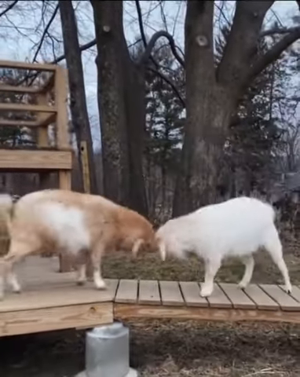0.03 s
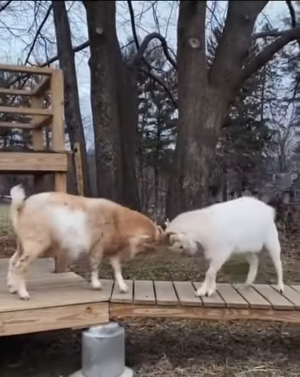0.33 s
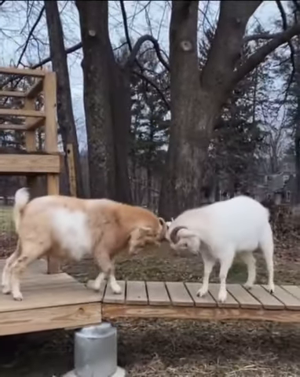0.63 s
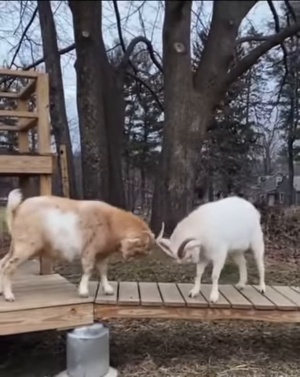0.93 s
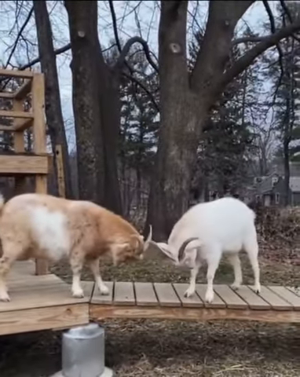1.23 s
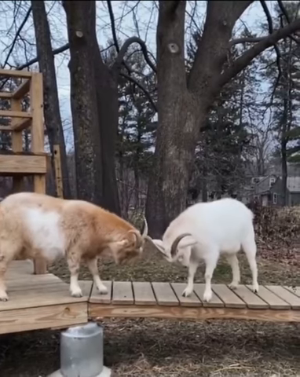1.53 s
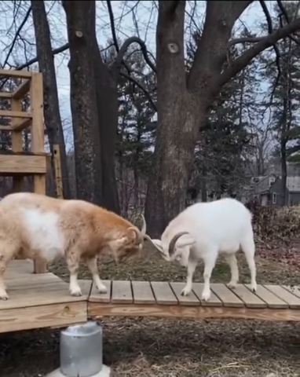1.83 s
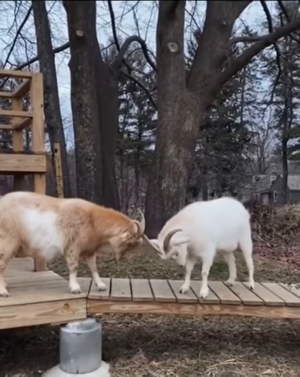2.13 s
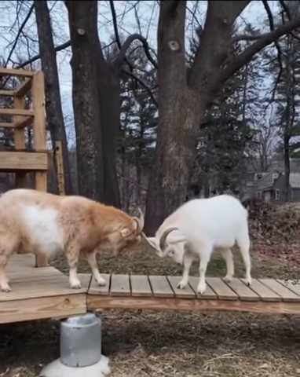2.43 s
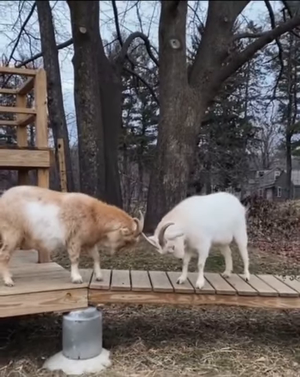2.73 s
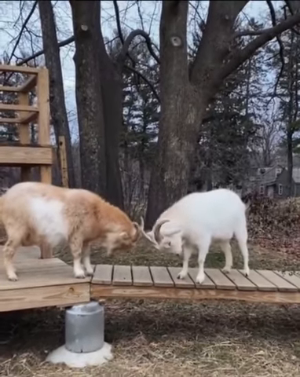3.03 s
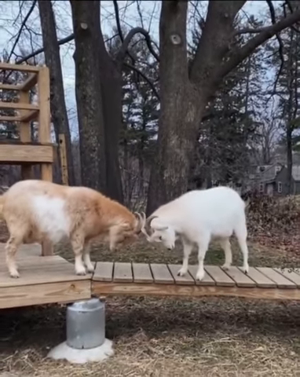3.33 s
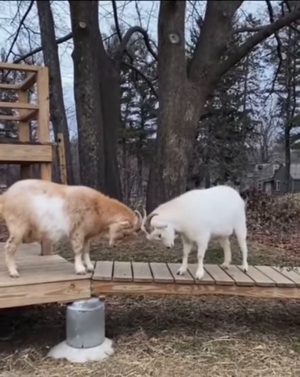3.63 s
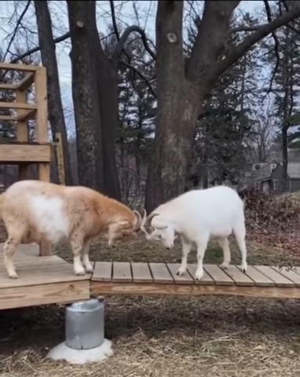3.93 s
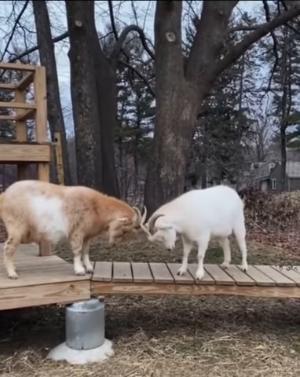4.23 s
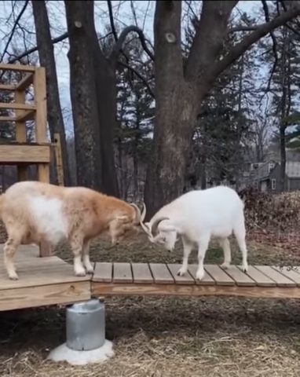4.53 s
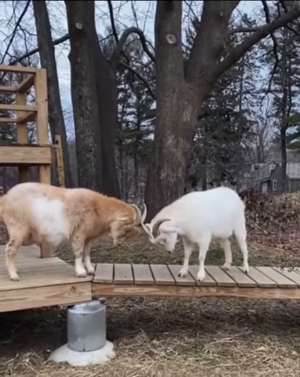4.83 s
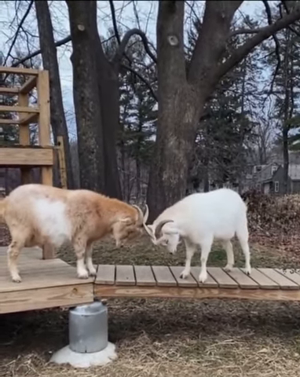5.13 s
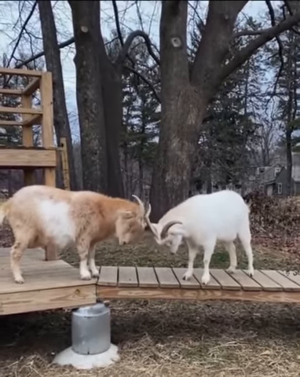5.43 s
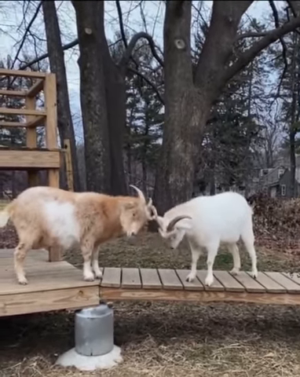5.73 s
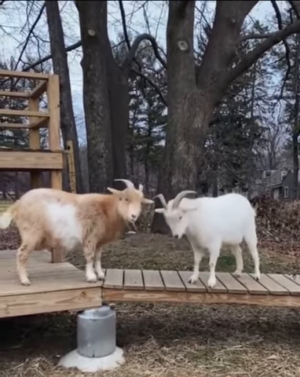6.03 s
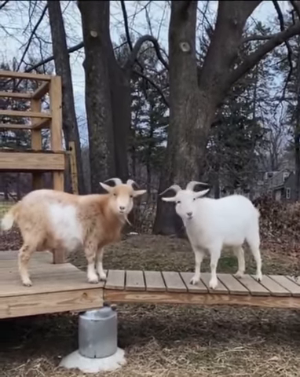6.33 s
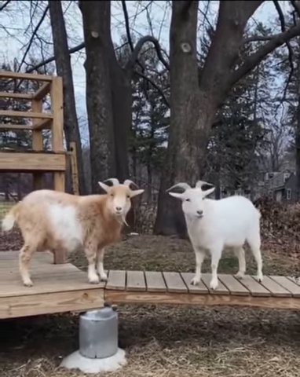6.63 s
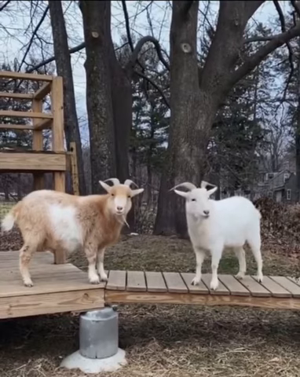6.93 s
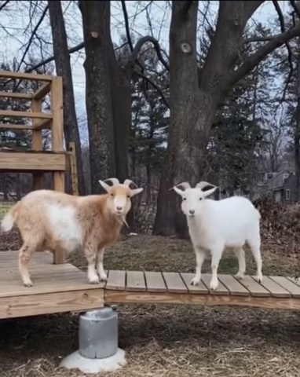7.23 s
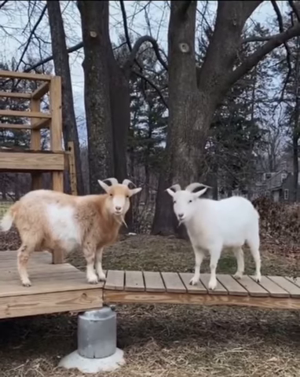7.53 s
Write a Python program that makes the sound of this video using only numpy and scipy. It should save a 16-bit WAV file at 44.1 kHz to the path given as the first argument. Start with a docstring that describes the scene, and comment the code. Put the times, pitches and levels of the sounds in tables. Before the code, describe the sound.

A quick, uneven burst of hoof knocks, horn clacks and scrapes on wooden boards opens the scene as two goats clash. It soon eases to faint rubbing of horn, hoof and coat, broken by a few small taps and a dull thump with a short scrape, then fades almost to nothing. The microphone is a few metres off in a yard with a steady low rumble.

```python
"""A raised wooden walkway in a quiet yard: two goats butt heads and shuffle, a few metres from a phone.
Horns and hooves clack, the planks ring under the blows and the beams thud as the weight shifts.
Then the goats lean on each other: hoof, horn and coat stick and slip in soft dry scuffs.
A low outdoor rumble runs underneath."""
import sys
import numpy as np
from scipy import signal
from scipy.fft import rfft, irfft, next_fast_len
from scipy.io import wavfile
from scipy.ndimage import uniform_filter1d

SR = 44100
rng = np.random.default_rng(int(sys.argv[2]) if len(sys.argv) > 2 else 0)


def log_audio(samples):
    """Write samples as a 16-bit WAV file to the path given in sys.argv[1]."""
    # one column per channel
    frames = np.atleast_2d(samples).T
    # limit to full scale, then quantise
    limited = np.clip(frames, -1, 1)
    pcm = np.round(limited * 32767).astype(np.int16)
    wavfile.write(sys.argv[1], SR, pcm)


N = 339129
TIME_S = np.arange(N) / SR
AGE_S = np.arange(SR // 2) / SR  # time within one event
MIC_LAG_S = 23 / SR  # right behind left


def undb(db):
    """Decibels to gain."""
    return 10 ** (np.asarray(db) / 20)


def db_at(spectrum, hz):
    """Read an f/Hz, level/dB table on a log-frequency axis."""
    f, db = np.transpose(spectrum)
    return np.interp(np.log(np.maximum(hz, 1)), np.log(np.maximum(f, 1)), db)


def shape(x, gain):
    """Zero-phase filter by gain(f)."""
    size = next_fast_len(x.shape[-1] + 2048)
    return irfft(rfft(x, size) * gain(np.fft.rfftfreq(size, 1 / SR)), size)[..., :x.shape[-1]]


def colour(x, spectrum):
    """Filter by an f/Hz, level/dB table."""
    return shape(x, lambda f: undb(db_at(spectrum, f)))


def resonate(x, hz, q, stages=1):
    """Two-pole resonances in series."""
    for _ in range(stages):
        x = signal.lfilter(*signal.iirpeak(hz, q, fs=SR), x)
    return x


def bell(f, centre_hz, width_oct):
    """Peak on a log-frequency axis, half height at +-width_oct."""
    return 1 / (1 + (np.log2(np.maximum(f, 1) / centre_hz) / width_oct) ** 2)


def unit(x):
    """Scale to rms 1."""
    return x / np.sqrt(np.mean(x ** 2))


def blow(x, db):
    """Scale so the energy, spread over 30 ms, has this level."""
    return unit(x) * undb(db) * np.sqrt(0.03 * SR / x.shape[-1])


def fade(t60_s):
    """Exponential decay."""
    return np.exp(-np.log(1000) * AGE_S / t60_s)


def rise(tau_s):
    """Exponential attack."""
    return 1 - np.exp(-AGE_S / tau_s)


def add(out, t_s, x):
    """Mix x into out from t_s."""
    i = max(int(t_s * SR), 0)
    out[:, i:i + x.shape[-1]] += x[..., :N - i]


def mic_noise(shared, lag_s=0):
    """Stereo noise; the shared fraction of its power arrives lag_s later on the right."""
    common, *own = rng.standard_normal((3, len(AGE_S)))
    pair = np.array([common, np.roll(common, round(lag_s * SR))])
    return np.sqrt(shared) * pair + np.sqrt(1 - shared) * np.array(own)


def ring_modes(hz, gains, decays, lag_rad):
    """Sum of decaying sines, lagging on the right."""
    phase = 2 * np.pi * hz[:, None] * AGE_S
    return np.array([gains @ (decays * np.sin(p)) for p in (phase, phase - lag_rad[:, None])])


# Outdoor noise density: f/Hz, level/dB
YARD_SPECTRUM = [(20, -24.5), (35, -7), (55, 3), (90, 0.5), (130, -1.5), (215, -9), (300, -12.5),
                 (450, -17.5), (680, -20.5), (900, -30.5), (1250, -44), (2700, -53.5), (4600, -57),
                 (7500, -50.5), (9700, -63)]
# Stereo width: f/Hz, side re mid/dB
YARD_WIDTH = [(60, -29.5), (110, -16), (190, -6.5), (330, -4), (590, 3), (1040, 9.5), (1830, 8),
              (3240, 11.5), (5730, -16), (10100, -2.5)]


def yard_rumble(waver_db=2.1, waver_step_s=0.09, pan_db=0.75):
    """Outdoor rumble, near mono in the bass, with faint air above; each octave wavers on its own."""
    mid, side = colour(rng.standard_normal((2, N)), YARD_SPECTRUM)
    left_right = np.array([[1], [-1]])
    air = mid + colour(side, YARD_WIDTH) * left_right
    octaves = np.arange(6, 14)  # 64 to 8192 Hz
    knots_s = np.arange(0, 8, waver_step_s)
    out = np.zeros((2, N))
    for octave in octaves:
        band = shape(air, lambda f: np.interp(np.log2(f + 1), octaves, octaves == octave))
        waver = np.interp(TIME_S, knots_s, rng.standard_normal(len(knots_s)))
        out += band * undb(waver_db * waver)
    level_db = np.interp(TIME_S, [3.5, 7.69], [-34, -37])
    return unit(out) * undb(level_db + pan_db * left_right)


def spot_note(hz, decay_cycles):
    """The struck spot's heavily damped note swells and dies within a few cycles."""
    lag_s = MIC_LAG_S * min(hz / 640, 1)
    cycles = hz * np.maximum([AGE_S, AGE_S - lag_s], 0)
    return np.sin(2 * np.pi * cycles) * cycles ** 2 * np.exp(-cycles / decay_cycles)


# Deck modes: f/Hz, level/dB, nominal t60/s
DECK_MODES = [(138, -1, 0.3), (152.4, 6, 0.35), (181.7, 9, 0.38), (212, 12, 0.13), (248, 8.5, 0.53),
              (292, 2, 0.37), (328.6, -7, 0.42), (369.6, 5, 0.29), (408.6, -6.5, 0.34), (455, 4, 0.4),
              (516, 9, 0.12), (568, -8, 0.28), (618, 5.5, 0.13), (691, 8.5, 0.18), (752, -1, 0.098),
              (836, 3.5, 0.16), (864, 4.5, 0.17), (991, 7.5, 0.13), (1183, 2, 0.26)]
# Hoof on plank: t/s, deck level/dB, deck centre f/Hz, plank re deck/dB, tock level/dB, tock f/Hz,
# tock decay/cycles, clack level/dB, clack f/Hz, crack re clack/dB
HOOFFALLS = [(0.001, -11, 181, -49, -19.5, 193, 2.5, -39.5, 1220, -2),
             (0.058, -34.5, 480, -13.5, -38, 560, 2, -52, 1200, -16),
             (0.1068, -15, 490, -16.5, -17, 607, 1.05, -23.5, 1573, -9.5),
             (0.1214, -17, 404, -33.5, -21, 430, 0.46, -32, 1456, -17),
             (0.166, -24, 366, -10, -28, 870, 1.2, -49, 1400, -22.5),
             (0.204, -27, 297, -8, -36.5, 740, 2, -32.5, 1070, -15),
             (0.261, -17.5, 377, -57, -24, 380, 2.7, -32, 1140, -15),
             (0.352, -24, 350, -16.5, -29, 827, 2.2, -32.5, 1160, -29),
             (0.458, -24, 285, -16.5, -28.5, 1314, 5.2, -27.5, 1450, -30),
             (0.4871, -17.5, 248, -6.5, -40.5, 725, 1.5, -23.5, 1595, -21),
             (0.492, -19.5, 455, -36, -24, 256, 0.63, -26, 1430, -21),
             (0.613, -33, 600, 0, -43, 776, 2, -38, 1610, -26),
             (0.682, -53.5, 720, -6, -42.5, 830, 1.2, -49.5, 1490, -25),
             (0.807, -29, 540, -2, -29.5, 703, 1.8, -31.5, 1384, -24),
             (0.817, -28, 514, -20, -37, 674, 3.3, -40, 1810, -3),
             (0.8421, -35, 750, -10, -26, 803, 1, -35, 1520, -7),
             (1.038, -22, 366, -10, -25.5, 670, 1.6, -28.5, 1286, -4.5),
             (1.056, -27, 296, -36, -23, 314, 1.18, -60, 1400, -21),
             (2.732, -26.5, 393, -21, -33.5, 467, 5, -35.5, 1018, -17.5),
             (2.758, -38, 330, -16, -31.5, 258, 1.7, -52, 1100, -13),
             (3.11, -30, 596, 0, -38.5, 554, 1.3, -39.5, 1430, -4.5),
             (3.152, -39, 520, -9, -38, 790, 0.6, -47, 1510, -24),
             (3.602, -38.5, 430, -16, -36, 278, 1.2, -43, 2210, -6),
             (5.502, -29, 245, -53, -32, 270, 0.58, -74, 1160, -40),
             (7.1947, -41.5, 553, -20, -40.5, 567, 0.53, -47.5, 1330, -15)]


def deck_knocks(plank_hz=790, t60_scale=0.8, uneven_db=5, rattle_db=-8, deck_delay_s=0.001663):
    """A hoof rings the deck and, higher up, the struck plank, with a hollow tock; loose boards rattle."""
    out = np.zeros((2, N))
    hz, mode_db, t60_s = np.transpose(DECK_MODES)
    decays = np.array([fade(t * t60_scale) for t in t60_s])
    # Low modes radiate from the whole deck and lag less; high ones come from the struck spot.
    lag_rad = 2 * np.pi * hz * MIC_LAG_S * np.minimum(hz / 640, 1)
    rattle_band = lambda f: np.minimum(f / 300, 1) ** 2 / (1 + (f / 1500) ** 4)
    for t_s, db, centre_hz, plank_db, tock_db, tock_hz, tock_cycles, *_ in HOOFFALLS:
        focus = lambda f: bell(f, centre_hz, 0.37) + undb(plank_db) * bell(f, plank_hz, 0.38)
        uneven, polarity, detune, skew = rng.standard_normal((len(hz), 4)).T
        gains = focus(hz) * undb(mode_db + uneven_db * uneven) * np.sign(polarity + 0.5)
        ring = ring_modes(hz * (1 + 0.007 * detune), gains, decays, lag_rad * (1 + 0.1 * skew))
        rattle = shape(mic_noise(shared=0.73), lambda f: focus(f) * rattle_band(f))
        body = unit(ring) + undb(rattle_db) * unit(rattle * fade(t60_s=0.36))
        tock = blow(spot_note(tock_hz, tock_cycles), tock_db)
        add(out, t_s + deck_delay_s, blow(body * rise(tau_s=0.0025), db) + tock)
    return out


# High modes of horn and board: f/Hz, level/dB
HARD_MODES = [(1004, 5.5), (1184, 3), (1271, 0), (1384, -3.5), (1451, -4.5), (1492, -3), (1662, 4),
              (1760, 1.5), (1873, -2.5), (2040, 3.5), (2208, 1.5), (2614, 1), (2850, 0)]


def clack(db, hz, crack_db, tick_db, tick_cycles, ring_s, crack_t60_s, crack_top_hz):
    """A hard contact ticks, snaps, cracks and rings nearby modes, with a brief, narrow ring at hz."""
    mode_hz, mode_db = np.transpose(HARD_MODES)
    full_blow_db = -35.5
    damped_s = ring_s * undb(0.1 * min(db - full_blow_db, 0))  # lighter touches ring shorter
    decays = np.array([fade(1.58 * damped_s * (1400 / f) ** 0.42) for f in mode_hz])
    uneven, polarity, detune, skew = rng.standard_normal((len(mode_hz), 4)).T
    gains = bell(mode_hz, hz, width_oct=1) ** 2 * undb(mode_db + 3 * uneven) * np.sign(polarity + 0.5)
    lag_rad = 2 * np.pi * mode_hz * MIC_LAG_S + skew
    ring = ring_modes(mode_hz * (1 + 0.0035 * detune), gains, decays, lag_rad)
    snap = resonate(mic_noise(shared=0.55, lag_s=MIC_LAG_S) * fade(t60_s=0.008), 0.875 * hz, q=5.4)
    pitched_ring = resonate(mic_noise(shared=0.83, lag_s=MIC_LAG_S) * fade(1.4 * damped_s), hz, q=24)
    band = signal.butter(3, [650, 3200], "band", fs=SR, output="sos")
    snap, pitched_ring = signal.sosfilt(band, [snap, pitched_ring])
    crack = resonate(mic_noise(shared=0.04) * fade(crack_t60_s), hz=2600, q=1.3, stages=2)
    crack = signal.sosfilt(signal.butter(4, crack_top_hz, fs=SR, output="sos"), crack)
    body = unit(ring) + undb(-2) * unit(snap) + undb(-5) * unit(pitched_ring)
    tick = undb(tick_db) * unit(spot_note(hz, tick_cycles))
    return blow(unit(body * rise(tau_s=0.0009)) + tick, db) + blow(crack, db + crack_db)


def hoof_clacks():
    """The hard edge of each hoof fall, ringing on with the board."""
    out = np.zeros((2, N))
    for t_s, *_, db, hz, crack_db in HOOFFALLS:
        add(out, t_s, clack(db, hz, crack_db, tick_db=-10, tick_cycles=0.45,
                            ring_s=0.085, crack_t60_s=0.075, crack_top_hz=4200))
    return out


# Weight dropping on the beams: t/s, level/dB, f/Hz
WEIGHT_DROPS = [(0.003, -20.5, 112.8), (0.174, -26, 99), (0.262, -21, 55.3), (0.271, -18.5, 123),
                (0.478, -26, 56.8), (0.622, -27.5, 69), (1.095, -25, 70.6), (5.511, -16, 86.4),
                (5.569, -21.5, 57.8), (6.715, -34, 79)]


def beam_thuds(overtone_ratio=2.1, overtone_db=-13):
    """Beams bend under a soft push and swing back, with a weaker, noisy overtone."""
    out = np.zeros((2, N))
    for t_s, db, hz in WEIGHT_DROPS:
        swing = np.sin(2 * np.pi * hz * AGE_S) * fade(t60_s=0.34) * rise(tau_s=0.004)
        burst = rng.standard_normal(len(AGE_S)) * fade(t60_s=0.12)
        overtone = resonate(burst, hz * overtone_ratio, q=1.8, stages=2)
        add(out, t_s, blow(unit(swing) + undb(overtone_db) * unit(overtone), db))
    return out


# Hoof or horn edge catching: peak t/s, half length/s, level/dB, f/Hz, Q
EDGE_CATCHES = [(0.06, 0.01, -48, 5000, 3), (0.114, 0.016, -46.5, 9100, 5),
                (0.192, 0.0078, -36.5, 6620, 15), (0.214, 0.01, -53, 5900, 7.5),
                (0.24, 0.0044, -46, 9200, 5), (0.283, 0.011, -41, 5280, 9.4), (0.311, 0.008, -51, 9250, 13),
                (0.492, 0.0099, -29, 2220, 3.8), (1.064, 0.0068, -42, 3320, 4.2),
                (1.357, 0.027, -46.5, 1850, 1.7), (1.434, 0.03, -50.5, 4700, 1.6),
                (1.55, 0.027, -57, 6600, 0.87), (1.693, 0.02, -56, 5000, 1.7), (1.81, 0.02, -54, 1700, 1.4),
                (1.953, 0.019, -51, 1560, 1.8), (1.96, 0.019, -53, 3600, 2.5), (2.061, 0.01, -50, 1400, 2),
                (2.119, 0.021, -56, 5350, 0.93), (2.365, 0.016, -54, 1500, 0.8),
                (2.397, 0.025, -59, 3940, 2.4), (2.648, 0.02, -52, 2760, 1.1),
                (3.304, 0.015, -52.5, 2140, 0.62), (3.484, 0.011, -50, 5470, 2.4),
                (3.619, 0.015, -40, 4450, 1.9), (3.855, 0.0055, -40, 4500, 0.69),
                (4.207, 0.016, -41.5, 610, 4.1), (4.871, 0.044, -56.5, 3670, 2.8),
                (5.077, 0.012, -50, 4000, 1.4), (5.138, 0.038, -57.5, 3520, 3.8),
                (5.636, 0.018, -38.5, 3670, 1.7), (5.787, 0.011, -52, 4470, 2),
                (6.514, 0.022, -58, 4520, 0.87), (7.19, 0.0039, -47.5, 1950, 3.6),
                (7.211, 0.004, -51.5, 1550, 2)]


def edge_catches(slips_per_s=1200, scatter_db=3):
    """An edge sticks and slips in a quick uneven run; each slip rings one resonance."""
    out = np.zeros((2, N))
    for t_s, half_s, db, hz, q in EDGE_CATCHES:
        start_s = max(t_s - AGE_S[-1] / 2, 0)
        slips = rng.random(len(AGE_S)) < slips_per_s / SR
        force = undb(scatter_db * rng.standard_normal(len(AGE_S)))
        judder = resonate(slips * force * mic_noise(shared=0.44), hz, q, stages=2)
        swell = np.exp(-((AGE_S + start_s - t_s) / half_s) ** 2 / 2)
        add(out, start_s, unit(judder) * undb(db) * swell)
    return out


def stepped_noise(hold_samples):
    """Sample-and-hold Gaussian noise."""
    return np.repeat(rng.standard_normal(len(AGE_S) // hold_samples + 1), hold_samples)[:len(AGE_S)]


def friction(spectrum, travel, grain_db=2.5, flutter_db=3, ripple_db=4.5):
    """Tiny slips under uneven pressure; the contact slides between two spots with their own resonances."""
    grid_hz = np.arange(500, 10000, 220)
    grain = stepped_noise(hold_samples=32)
    flutter = uniform_filter1d(stepped_noise(hold_samples=600), size=200)
    pressure = undb(grain_db * grain + flutter_db * flutter)
    out = 0
    for share in (np.cos(np.pi * travel), np.sin(np.pi * travel)):
        spot_db = db_at(spectrum, grid_hz) + ripple_db * rng.standard_normal(len(grid_hz))
        slips = rng.standard_normal((2, len(AGE_S))) * pressure
        out += share * unit(colour(slips, [(100, -60), *zip(grid_hz, spot_db)]))
    return out


# Rubbing as the goats lean on each other: t/s, hiss level/dB
LEAN_LEVEL = [(0, -43), (0.53, -53.5), (0.7, -61.5), (0.9, -56), (1.2, -62.5), (1.6, -54.5), (2.1, -55.5),
              (2.65, -59.5), (3.0, -60.5), (3.3, -57), (3.72, -52), (4.15, -58), (5.35, -60), (5.8, -54),
              (6.25, -62), (6.95, -59.5), (7.69, -62.5)]
# Coarse to soft as the fight eases: t/s, rasp re hiss/dB
LEAN_RASP = [(3.7, 4.5), (4.5, -2.5)]


def leaning_rubs(gap_s=0.14, half_s=0.062, jitter_s=0.01, uneven_db=1.4, sizzle_db=-7.5):
    """Faint overlapping strokes that follow the push, as rows like SCRAPES."""
    times_s = np.arange(gap_s / 2, TIME_S[-1], gap_s)
    times_s += jitter_s * rng.standard_normal(len(times_s))
    hiss_db = np.interp(times_s, *np.transpose(LEAN_LEVEL))
    hiss_db += uneven_db * rng.standard_normal(len(times_s))
    rasp_db = np.interp(times_s, *np.transpose(LEAN_RASP))
    return [(t_s, half_s, db, rasp, sizzle_db) for t_s, db, rasp in zip(times_s, hiss_db, rasp_db)]


# Low, middle and high friction bands: f/Hz, level/dB
RASP_SPECTRUM = [(500, 7), (1100, -1.5), (1800, -0.5), (2500, -5), (3200, -14.5), (5000, -51)]
HISS_SPECTRUM = [(1800, -10.5), (2500, -1.5), (3300, 0.5), (4600, 5.5), (5500, 1), (6500, -1.5),
                 (8000, -47)]
SIZZLE_SPECTRUM = [(5000, -15), (6800, -3.5), (8200, -1), (9700, -4)]
# Single scrapes: peak t/s, half length/s, hiss level before trim/dB, rasp re hiss/dB, sizzle re hiss/dB
SCRAPES = [(0.087, 0.062, -45.5, 13.5, -3), (0.177, 0.05, -40.5, 12, -25), (0.287, 0.04, -39, 4, -10),
           (0.49, 0.019, -40, 11.5, -6.5), (1.033, 0.013, -44, 5, -38), (1.401, 0.045, -46, 2.5, 0.5),
           (1.971, 0.046, -54.5, 8, -27), (2.899, 0.014, -51, 10, -11), (3.489, 0.05, -47.5, -16, 0),
           (3.624, 0.046, -41, -4, -24), (3.854, 0.015, -40.5, -5.5, -4), (4.239, 0.023, -50, -20, -2),
           (4.869, 0.042, -50, -23, 2.5), (5.107, 0.037, -51.5, -10, 1), (5.553, 0.036, -46, -18, -3),
           (5.63, 0.026, -36.5, -26, 1.5), (5.684, 0.032, -44, -7, 2), (6.48, 0.1, -59.5, -2, 0.5)]


def scuffing(trim_db=-1):
    """Hoof, horn and coat rub dry; each stroke swells and dies in three friction bands."""
    out = np.zeros((2, N))
    for t_s, half_s, db, rasp_db, sizzle_db in [*SCRAPES, *leaning_rubs()]:
        start_s = max(t_s - AGE_S[-1] / 2, 0)
        travel = (AGE_S + start_s - t_s) / (2 * half_s)
        swell = np.exp(-1.5 * travel ** 2)
        for spectrum, band_db in (RASP_SPECTRUM, rasp_db), (HISS_SPECTRUM, 0), (SIZZLE_SPECTRUM, sizzle_db):
            add(out, start_s, friction(spectrum, travel) * undb(db + band_db + trim_db) * swell)
    return out


# Horn or hoof-tip taps: t/s, level/dB, f/Hz, relative crack/dB, relative tick/dB, tick decay/cycles
HORN_TAPS = [(0.1302, -39, 1600, -11, 0, 0.84), (0.1646, -37, 2320, -12, 0.5, 0.49),
             (0.1658, -28, 1790, -15, 13, 2), (0.2618, -31, 1287, -19, 8, 1.3),
             (0.4901, -20.5, 1506, -35, -8, 0.59), (0.808, -41, 1700, -25, 10, 0.3),
             (0.844, -33.5, 1920, -15, 3, 0.58), (0.8445, -35.5, 1560, -3.5, -1, 0.22),
             (0.8619, -26.5, 1760, -12.5, 8, 0.41), (2.896, -50, 2240, 3, -5, 0.26),
             (3.01, -44, 1420, -15, 2, 0.89), (3.109, -40.5, 1840, -21, 10, 1.4),
             (3.123, -39.5, 1140, -26, 10, 0.22), (3.152, -45, 1810, -22, 12, 0.85),
             (3.6931, -39, 1640, -25, 7, 0.56), (3.8322, -53.5, 2140, 4.5, -5, 0.45),
             (5.7050, -49, 1510, -13, 4, 0.22), (7.1975, -44.5, 1340, -24, 10, 0.7)]


def horn_taps():
    """Sharp, dry contacts that stop short."""
    out = np.zeros((2, N))
    for t_s, *tap in HORN_TAPS:
        add(out, t_s, clack(*tap, ring_s=0.03, crack_t60_s=0.018, crack_top_hz=8750))
    return out


def reflections(x, wet_db=-21, t60_s=0.33):
    """Tree trunks and the deck frame scatter a thin, dull tail."""
    noise = rng.standard_normal((2, len(AGE_S)))
    tail = colour(noise, [(100, -11.5), (400, -2.5), (2000, 0), (6000, -5)])
    tail = unit(tail * fade(t60_s) * rise(tau_s=0.0016)) / np.sqrt(len(AGE_S))
    return undb(wet_db) * signal.fftconvolve(x, tail, axes=1)[:, :N]


# Balance of the direct hits: f/Hz, left re right/dB
HIT_BALANCE = [(60, -1.5), (190, 4.5), (400, 4.5), (720, 7), (1000, 19), (1400, 9), (2000, 1), (3200, -2),
               (9000, 1)]


def hit_pan(f):
    """Constant-power left and right gains per frequency."""
    left_share = 1 / (1 + undb(-db_at(HIT_BALANCE, f)) ** 2)
    return np.sqrt(2 * np.array([left_share, 1 - left_share]))


def scene():
    """The fight, a little to the left, in its yard."""
    hits = deck_knocks() + hoof_clacks() + horn_taps() + beam_thuds()
    return shape(hits, hit_pan) + reflections(hits) + scuffing() + edge_catches() + yard_rumble()


def record(dry, ceiling=0.9, top_hz=9650):
    """The phone rounds the loudest peaks and cuts the top."""
    rounded = dry / (1 + (dry / ceiling) ** 4) ** 0.25
    return signal.sosfilt(signal.ellip(10, 0.2, 80, top_hz, fs=SR, output="sos"), rounded)


dry = scene()
out = record(dry)
log_audio(out)
```